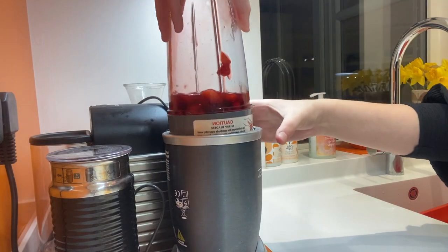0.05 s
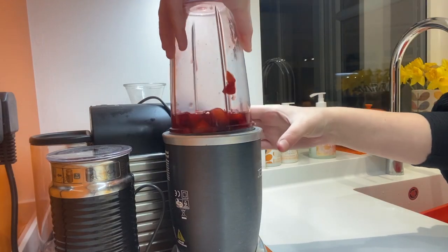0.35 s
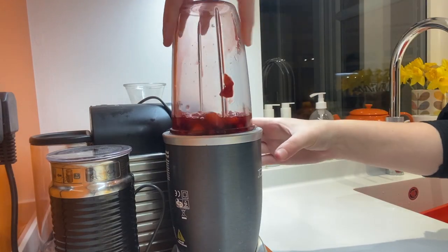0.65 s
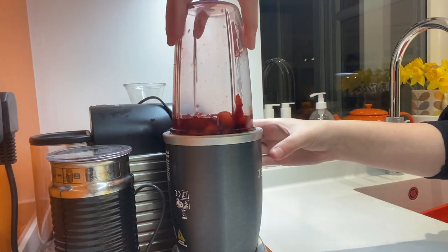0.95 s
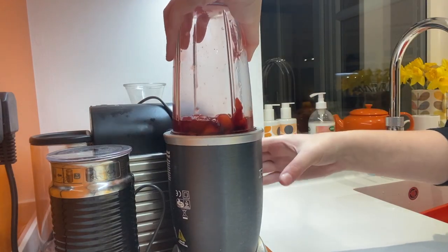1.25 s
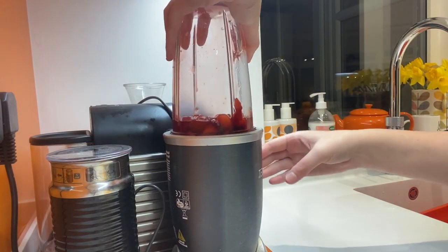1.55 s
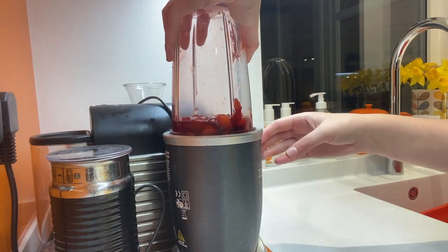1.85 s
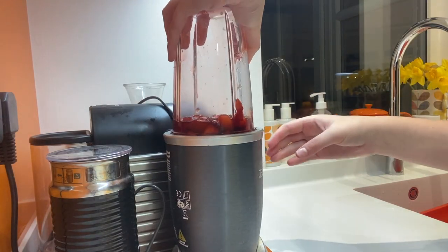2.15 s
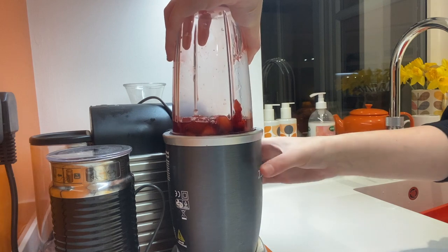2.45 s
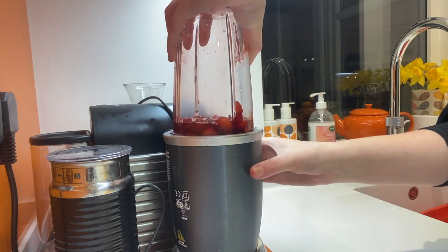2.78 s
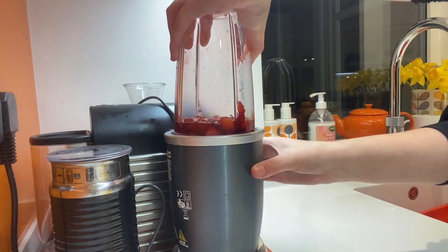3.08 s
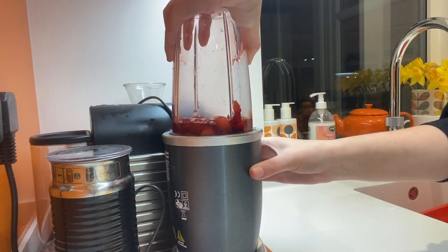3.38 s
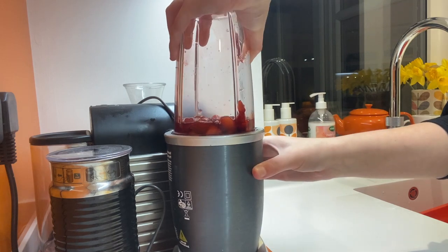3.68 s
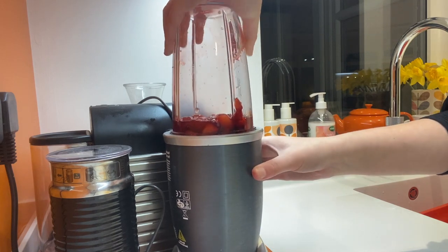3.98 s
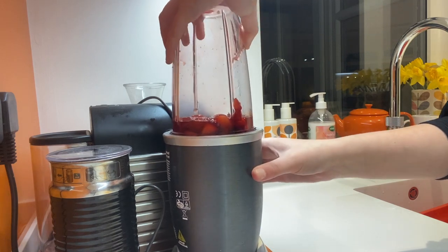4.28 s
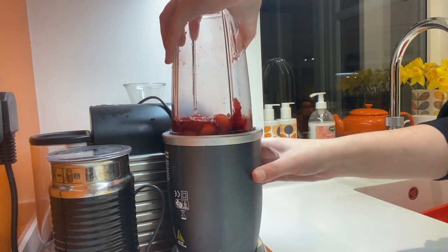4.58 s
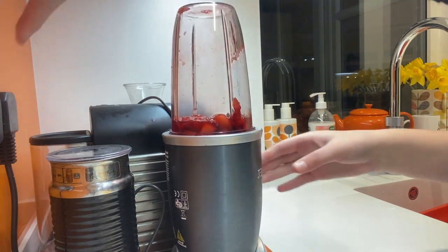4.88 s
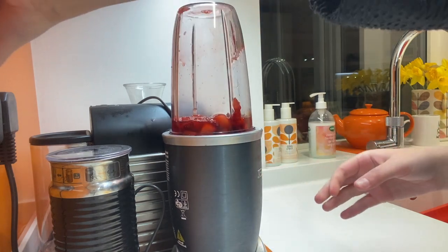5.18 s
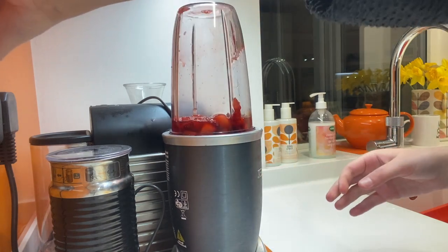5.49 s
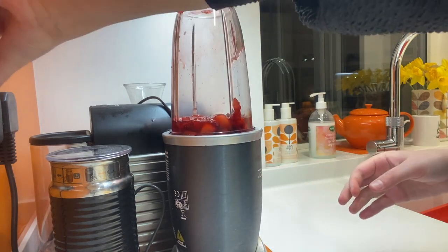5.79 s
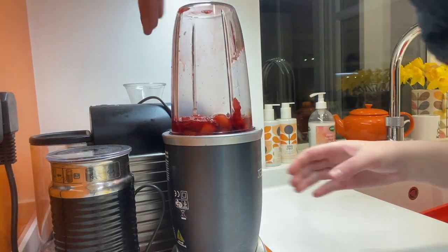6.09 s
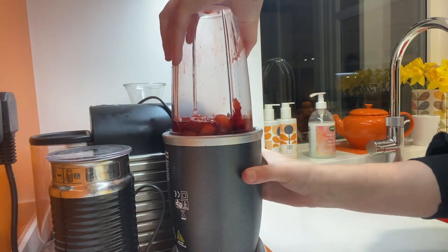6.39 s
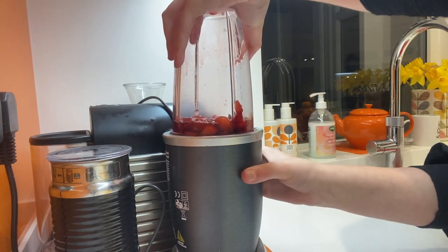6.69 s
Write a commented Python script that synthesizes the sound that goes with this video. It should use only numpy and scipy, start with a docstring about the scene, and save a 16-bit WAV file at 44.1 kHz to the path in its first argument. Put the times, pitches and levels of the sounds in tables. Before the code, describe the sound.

Hollow knocks and sharp plastic snaps of a blender cup being locked in, with rubbing fingers and two switch flicks in a small kitchen.

```python
"""Over a soft hiss, hands set a plastic blender cup on its motor base on a kitchen worktop: the cup
ticks and the heavy base clunks and rocks. Then the cup is pressed down and twisted: its lugs (small
locking tabs) tick and snap in their slots, and fingers slide on the plastic. After 5 seconds a wall
socket's switch is flicked twice. Last come one more rub, knock and snap from the cup.
The motor stays off throughout, and the small hard room answers each blow."""
import sys
import numpy as np
from scipy import signal
from scipy.io import wavfile

SR = 44100
rng = np.random.default_rng(int(sys.argv[2]) if len(sys.argv) > 2 else 0)


def generate_wav(signal):
    """Clip the signal to [-1, 1] and save it as 16-bit WAV at the path in sys.argv[1]."""
    frames = np.transpose(np.atleast_2d(signal))
    scaled = np.clip(frames, -1, 1) * 32767
    pcm = np.round(scaled).astype(np.int16)
    wavfile.write(sys.argv[1], SR, pcm)


N = 297234
RING_S = np.arange(int(.6 * SR)) / SR   # the clock for one ring or echo, in seconds


def from_db(db):
    """Turn decibels into a number to multiply by."""
    return 10 ** (np.asarray(db) / 20)


def rms_one(x):
    """Scale a sound so that its average strength (rms) is 1."""
    return x / np.sqrt(np.mean(x ** 2) + 1e-20)


def at_hz(points, hz):
    """Read between the rows of a table, giving each octave equal room."""
    points = np.array(points)
    return np.interp(np.log(hz), np.log(points[:, 0]), points[:, 1])


def add(out, s, sound):
    """Mix a stereo sound in, starting at s seconds."""
    start = max(int(s * SR), 0)
    out[:, start:start + sound.shape[1]] += sound[:, :N - start]


def mode(hz, t60, rise_cycles, lag_s):
    """One ringing tone: it swells, fades 60 dB in t60 seconds and reaches the right ear later."""
    t = np.maximum(RING_S - np.array([[0], [lag_s]]), 0)
    return np.sin(2 * np.pi * hz * t) * from_db(-60 * t / t60) * (1 - np.exp(-t * hz / rise_cycles))


# How alike the two ears hear noise. Each row: pitch in Hz, likeness (1 is the same, 0 is unrelated).
EAR_LIKENESS = [(60, 0.66), (130, 1), (290, -0.046), (640, 0.014), (1400, -0.21), (3000, 0.087),
                (15000, 0.14)]
def noise_bands(size):
    """Noise from all around, in half-octave bands, each given with its middle pitch."""
    edges_hz = 28 * 2 ** np.arange(0, 9.6, .5)
    white = rng.standard_normal((2, 2, size))
    for k, (low, high) in enumerate(zip(edges_hz, edges_hz[1:])):
        band_filter = signal.butter(2, [low, high], "band", fs=SR, output="sos")
        mid, side = signal.sosfilt(band_filter, white[k % 2])
        hz = np.sqrt(low * high)
        alike = np.clip(at_hz(EAR_LIKENESS, hz), -1, 1)
        yield hz, np.sqrt(1 + alike) * mid + np.sqrt(1 - alike) * side * [[1], [-1]]


def coloured(spectrum):
    """Steady stereo noise whose mix of low and high follows a table."""
    return rms_one(sum(from_db(at_hz(spectrum, hz)) * band for hz, band in noise_bands(N)))


# The tone of the steady hiss. Each row: pitch in Hz, level in dB.
HISS_TONE = [(18, -36), (30, -14), (59, -15), (87, -16.5), (380, -25.5), (530, -31), (1000, -26),
             (1440, -24), (1870, -15), (3070, -18.5), (4200, -46.5), (6700, -22.5), (8250, -33),
             (10200, -52.5), (15000, -47.5)]
def background(edge_hz=3400, thin_db=-5.5):
    """A soft hiss that drops steeply to a fainter, thin top."""
    hiss = coloured(HISS_TONE)
    dull = signal.sosfilt(signal.butter(8, edge_hz, "low", fs=SR, output="sos"), hiss)
    thin = signal.sosfilt(signal.butter(8, edge_hz, "high", fs=SR, output="sos"), hiss)
    return dull + from_db(thin_db) * thin


def echo(x, response, gap_s):
    """Give a mono sound a stereo pattern of echoes, after a short gap."""
    response = rms_one(response) / np.sqrt(len(RING_S))
    delayed = np.pad(response, ((0, 0), (int(gap_s * SR), 0)))
    return signal.fftconvolve(x[None], delayed, axes=1)[:, :N]


def room_clicks(rows, level_db, low_cut_hz=350, usual_bright_db=4.0, bright_share=0.93):
    """A snap spreads in all directions and reaches the room as a plain click."""
    plain, bright = np.zeros((2, N))
    s, db, brightness = np.transpose(rows)[:3]
    at = (s * SR).astype(int)
    plain[at] = from_db(db + level_db)
    bright[at] = plain[at] * (from_db(bright_share * (brightness - usual_bright_db)) - 1)
    clicks = plain + signal.lfilter(*signal.butter(1, 5000, "high", fs=SR), bright + 1e-18)
    return signal.lfilter(*signal.butter(2, low_cut_hz, "high", fs=SR), clicks + 1e-18)


# The tone of the room's echo. Each row: pitch in Hz, level in dB.
ROOM_TONE = [(40, -12), (110, 7.5), (170, 3), (250, -2), (500, -9), (1000, -5.5), (2400, -2), (5000, -9),
             (8000, -5.5), (15000, -13)]
# How long the echo lasts. Each row: pitch in Hz, fade time in seconds.
ROOM_FADE = [(60, 0.21), (200, 0.36), (600, 0.6), (2400, 0.76), (5000, 0.64), (8000, 0.66), (15000, 0.39)]
# The room's air and hard things ring along. Each row: pitch in Hz, level in dB, fade time in seconds.
KITCHEN_RINGS = [(112.2, -45, .38), (246.3, -51.5, .4), (385.6, -51.5, 0.27), (474, -56.5, 0.15),
                 (807, -57, .4), (1294, -54.5, .45), (1893, -47, 0.82), (2006, -47.5, .6),
                 (2270, -48, 0.26), (2376, -48, .5), (2800, -43.5, .5), (3066, -45, 0.39), (4320, -38, .45),
                 (7210, -47, 0.53), (7860, -44, .35)]
def kitchen(near, outward, tail_db=-16.5, early_db=-8.0, early_t60=0.11, rings_db=-20.5):
    """Worktop, wall and appliances throw back quick echoes; then the room rings on."""
    tail = sum(from_db(at_hz(ROOM_TONE, hz) - 60 * RING_S / at_hz(ROOM_FADE, hz)) * band
               for hz, band in noise_bands(len(RING_S)))
    early = sum(band for hz, band in noise_bands(len(RING_S))) * from_db(-60 * RING_S / early_t60)
    early = signal.lfilter(*signal.butter(2, 450, "high", fs=SR), early)
    rings = 0
    for hz, db, t60 in KITCHEN_RINGS:
        # the ears hear low rings in step and high ones apart
        phase = min(hz / 1000, 2) * rng.uniform(-1, 1, (2, 1))
        rings += from_db(db + rings_db - 60 * RING_S / t60) * np.sin(2 * np.pi * hz * RING_S + phase)
    return (from_db(early_db) * echo(near, early, gap_s=0.0045)
            + from_db(tail_db) * echo(outward, tail, gap_s=.008)
            + signal.fftconvolve(outward[None], rings, axes=1)[:, :N])


def stick_slip(slips_per_s=900, slip_s=.001, smooth_drag=.9):
    """Sliding skin catches and lets go in tiny slips, on top of a smooth drag."""
    slips = (rng.random(N) < slips_per_s / SR) * rng.exponential(1, N)
    return rms_one(smooth_drag + signal.lfilter([1], [1, -np.exp(-1 / (slip_s * SR))], slips + 1e-18))


# The tones of rubbing palms and of sliding fingers. Each row: pitch in Hz, level in dB.
PALM_TONE = [(30, -20.5), (50, 2), (110, -0.5), (250, -12.5), (420, -8), (700, -21), (1500, -22.5),
             (4000, -41)]
FINGER_TONE = [(500, -26), (2000, 5), (6000, -11), (8500, -3), (12000, -4.5), (16000, -24.5)]
# When palms hold and when fingers slide. Each row: start in seconds, end in seconds, level in dB.
PALM_GRIPS = [(0, .3, -58.5), (0.311, 1.271, -55), (2.276, 3.55, -59), (3.766, 4.024, -50),
              (4.199, 4.733, -55), (6.238, 6.64, -59)]
FINGER_STROKES = [(0.27, 0.435, -57.5), (0.472, 0.836, -61), (1.077, 1.404, -52.5), (4.003, 4.12, -55),
                  (4.39, 4.486, -59), (4.66, 4.823, -48.5), (4.788, 4.993, -52.5), (6.188, 6.46, -49),
                  (6.373, 6.74, -53)]
def hands(slide_db=-6.0, attack_s=0.015, release_s=0.12):
    """Palms drag on the cup with a low, uneven rub; fingers hiss in scratchy, swelling strokes."""
    t = np.arange(N) / SR
    grip = from_db(2.5 * np.interp(t * 60, np.arange(420), rng.standard_normal(420)))
    waver = from_db(3.5 * np.interp(t * 14, np.arange(100), rng.standard_normal(100)))
    rub = sum(from_db(db) * np.exp(np.minimum(t - start, 0) / attack_s
                                   - np.maximum(t - end, 0) / release_s)
              for start, end, db in PALM_GRIPS)
    slide = sum(from_db(db + slide_db) * np.sin(np.pi * np.clip((t - start) / (end - start), 0, 1))
                for start, end, db in FINGER_STROKES)
    return grip * (rub * coloured(PALM_TONE) + slide * waver * stick_slip() * coloured(FINGER_TONE))


# The tone of cracking plastic. Each row: pitch in Hz, level in dB.
PLASTIC_TONE = [(400, -11.5), (800, 0.5), (1400, -11), (2400, 2), (4000, -1), (5500, -12), (7800, 1),
                (10000, -10.5), (13000, -10), (16000, -13.5)]
def plastic_grain():
    """Plastic has so many short rings that they blur into noise."""
    return coloured(PLASTIC_TONE)


def crack(grain, t60, rise_s, treble_db, treble_t60=0.23):
    """A short burst cut from the noise in grain; its highest sounds die first."""
    start = rng.integers(N - len(RING_S))
    burst = grain[:, start:start + len(RING_S)] * from_db(-60 * RING_S / t60)
    burst *= 1 - np.exp(-RING_S / rise_s)
    treble = signal.lfilter(*signal.butter(1, 5000, "high", fs=SR), burst)
    return burst + (from_db(treble_db - 60 * RING_S / treble_t60) - 1) * treble


# The switch plate and the box behind it. Each row: pitch in Hz, level in dB, fade time in seconds.
SWITCH_RINGS = [(94, -36, 0.12), (172.2, -22, 0.09), (243.4, -32, .12), (356, -9.5, 0.046),
                (489, -15, 0.095), (624, -15, .06), (830, -7, 0.071), (964, -14, 0.055), (1310, -11, .045),
                (1547, -20.5, .04), (1900, -16.5, .055), (2230, -16.5, 0.069), (2422, -13, 0.053),
                (2647, -12.5, 0.098), (4235, -14, 0.043), (7200, -16, .03)]
# The two flicks. Each row: start in seconds, level in dB, brightness in dB, extra thump in dB.
SWITCH_FLICKS = [(5.3776, -4.5, -14.5, 1), (5.759, -6.5, -16, 8.5)]
def wall_switch(grain, crack_db=-5.5, stop_db=-5.0, stop_s=0.0021, plate_db=-1.0, usual_bright_db=-22.0):
    """The springy switch snaps over and hits its stop; the plate rings and the hollow box thumps."""
    out, hz = np.zeros((2, N)), np.array(SWITCH_RINGS)[:, 0]
    rings = np.array([(-1) ** k * mode(f, t60, rise_cycles=1.36, lag_s=0.000515) * from_db(db)
                      for k, (f, db, t60) in enumerate(SWITCH_RINGS)])
    for s, db, brightness, thump_db in SWITCH_FLICKS:
        flip = crack(grain, t60=0.028, rise_s=0.0003, treble_db=brightness - usual_bright_db)
        stop = crack(grain, t60=0.03, rise_s=0.00025, treble_db=3.0)
        plate = np.tensordot(from_db(db + plate_db + thump_db * (hz < 250)), rings, 1)
        add(out, s, from_db(db + crack_db) * flip)
        add(out, s + stop_s / 2, plate)
        add(out, s + stop_s, from_db(db + crack_db + stop_db) * stop)
    return out


def fidgets(per_s=7.9, spread_db=8):
    """List small random shifts of the held cup, stronger under a firmer grip."""
    slots = np.arange(0, N / SR - .1, 1 / per_s)
    delays, sizes = rng.random((200, 2))[:len(slots)].T
    return [(s, db + spread_db * (size - .5)) for s, size in zip(slots + delays / per_s, sizes)
            for start, end, db in PALM_GRIPS if start < s < end]


# The plastic cup ticks against the base and, when twisted, snaps in its slots.
# Each row: start in seconds, level in dB, brightness in dB.
CUP_TICKS_AND_SNAPS = [(0.2763, -39, -10.5), (0.5903, -30, -23.5), (0.818, -24, -18.5),
                       (1.0277, -44.5, -18.5), (1.119, -39, -39.5), (1.1831, -33, -35),
                       (1.2334, -38.5, -12), (1.8226, -38.5, -41), (1.917, -40, -38),
                       (1.9816, -42.5, -13.5), (2.2149, -37, -10), (2.3826, -28, -14), (2.39, -30, -9),
                       (2.402, -23, -13), (2.419, -15.5, -17), (2.5908, -22, -11), (2.8706, -9.5, -14),
                       (3.1991, -34, -15.5), (3.5921, -30.5, -31.5), (3.8036, -25.5, -6),
                       (3.8141, -19, -24), (4.4308, -34, -31.5), (4.5465, -38.5, -52),
                       (5.3032, -39.5, -16.5), (6.2369, -33.5, -38), (6.4924, -38.5, -34),
                       (6.5482, -21.5, -11)]
def ticks(shifts, knock_db=-4.5, knock_bright_db=-31, fidget_db=8, fidget_bright_db=-36.5):
    """List the cup's ticks and snaps, plus a dull tick for each knock and small shift."""
    knock_ticks = [(s, db + hardness + knock_db, knock_bright_db) for s, db, hardness, *_ in CUP_KNOCKS]
    fidget_ticks = [(s, db + fidget_db, fidget_bright_db) for s, db in shifts]
    return list(CUP_TICKS_AND_SNAPS) + knock_ticks + fidget_ticks


def regrip(ring, detune):
    """The changing grip shifts the pitch of a ring a little."""
    stretched_s = RING_S * (1 + detune * rng.standard_normal())
    return np.array([np.interp(stretched_s, RING_S, ear) for ear in ring])


# The tones of the cup wall. Each row: pitch in Hz, level in dB, fade time in seconds.
CUP_RINGS = [(990, -9.5, 0.028), (1306, -25, 0.097), (1655, -8, 0.041), (1980, -30.5, .05),
             (2256, -27.5, 0.037), (2560, -15.5, 0.03), (3560, -5.5, 0.02), (4410, -5.5, 0.021)]
def cup_clicks(contacts, grain, wall_db=-4.5, usual_bright_db=-10.5, scatter_db=7.0):
    """Each tick or snap is a crack, then the short ring of the cup wall."""
    out, hz = np.zeros((2, N)), np.array(CUP_RINGS)[:, 0]
    rings = np.array([mode(f, t60, rise_cycles=1.6, lag_s=0.00016) * from_db(db)
                      for f, db, t60 in CUP_RINGS])
    for s, db, brightness in contacts:
        burst = crack(grain, t60=0.03, rise_s=0.0011, treble_db=brightness - usual_bright_db)
        # dull contacts bring out the hollow middle tones
        dullness = np.clip(-13 - brightness, 0, 16)
        hollow = dullness * at_hz([(1200, -1), (1700, .7), (2400, .1), (3400, .1), (4500, -.6)], hz)
        strengths = from_db(wall_db + hollow + scatter_db * rng.standard_normal(len(hz)))
        wall = np.tensordot(strengths * rng.choice([-1, 1], len(hz)), rings, 1)
        add(out, s, from_db(db) * (burst + regrip(wall, detune=0.038)))
    return out


# The cup bumps the base. Each row: start in seconds, level in dB, hardness in dB (more gives more
# high ring), favoured pitch in Hz, how many seconds earlier a first touch comes (0 for none).
CUP_KNOCKS = [(0.156, -34.5, -14.5, 474, 0.0021), (0.276, -35, -18.5, 216, 0.0011),
              (0.373, -21, -42.5, 151, 0.0022), (0.418, -24, -38, 170, 0), (0.587, -11, -27.5, 212, 0.022),
              (0.818, -4, -20.5, 192, .016), (1.119, -34, -15.5, 295, 0), (1.184, -8, -30, 215, .024),
              (1.313, -40.5, -14, 170, 0.0018), (1.918, -42.5, -20.5, 408, 0), (2.014, -44, -9, 320.5, 0),
              (2.255, -42, -23, 239, 0.00012), (2.426, -27.5, -12.5, 470, .031),
              (2.592, -24, -18, 444, .016), (2.872, -24.5, -19, 355, 0), (3.377, -20, -14, 284, 0.045),
              (3.592, -25.5, -19, 406, 0.00013), (3.607, -26.5, -22, 400, 0.00016),
              (3.642, -14, -22, 455, 0.003), (3.77, -41, -12, 400, 0.002), (3.816, -15, -23.5, 148, 0),
              (4.319, -31, -27, 248, 0.0013), (4.36, -24.5, -17.5, 375, 0.0019), (4.552, -40, -18, 373, 0),
              (4.436, -36.5, -15, 149.8, 0), (4.611, -22.5, -20, 385, 0), (4.76, -42.5, -5, 400, 0),
              (4.987, -51, -10.5, 301, 0.0024), (5.278, -46.5, -3, 387, 0.0013),
              (6.226, -41, -21, 153, 0.0052), (6.549, -26.5, -22.5, 415, .032)]
def bumps(shifts, usual_db=-17.5, usual_hz=249, touch_db=-31.5, touch_follows=0.35,
          rock_s=0.042, rock_loss_db=21.5, rock_hz=162,
          fidget_db=9.5, fidget_hardness_db=-18.0, fidget_hz=320):
    """List every blow to the base: knocks, first touches, rocking back and small shifts."""
    rows = []
    for s, db, hardness, hz, ahead_s in CUP_KNOCKS:
        rows.append((s, db, hardness, hz))
        if ahead_s > 0:
            rows.append((s - ahead_s, touch_db + touch_follows * (db - usual_db), hardness, hz))
        if hz < 275:   # after a low, heavy push the base rocks back onto its feet
            rows.append((s + rock_s, db - rock_loss_db, hardness, rock_hz))
    rows += [(s, db + fidget_db, fidget_hardness_db, fidget_hz) for s, db in shifts]
    blows = []
    for s, db, hardness, hz in rows:
        # low-pitched and gentle pushes carry more low thud
        weight_db = -7 - 7.5 * np.log2(hz / usual_hz) - 0.14 * (db - usual_db)
        blows.append((s, db, weight_db, hardness, hz))
    return blows


# The tone of the grinding rim. Each row: pitch in Hz, level in dB.
RIM_TONE = [(100, -15.5), (300, 0.5), (550, -5.5), (1000, -4), (1500, -12.5), (2500, -20.5), (5000, -38.5)]
def rim_crunch(blows, level_db=3.5, t60=0.0626, rise_s=0.0022):
    """A hard knock briefly grinds the cup's rim into its seat; the right ear hears it later."""
    out, left = np.zeros((2, N)), coloured(RIM_TONE)[0]
    grain = np.array([left, np.roll(left, 20)])
    for s, db, _, hardness, _ in blows:
        add(out, s, from_db(db + hardness + level_db) * crack(grain, t60, rise_s, treble_db=0.0))
    return out


# The tones of the base on the worktop and of the air in the cup.
# Each row: pitch in Hz, level in dB, fade time in seconds, how much louder on the left in dB.
BASE_RINGS = [(46.7, -15, .3, -1), (86.5, -4.5, .06, 2), (112, -3, 0.12, .5), (134.7, -7.5, .08, -1),
              (168.3, -6.5, 0.1, 2.5), (210.4, -11, 0.13, 4.5), (247.1, -5, 0.12, 1),
              (303, -2.5, 0.066, 7.5), (343, -3.5, 0.073, -1.5), (389, 1, 0.098, 7.5),
              (479.4, -5, 0.098, 5), (544, -14, 0.075, 15), (600.6, -15.5, 0.098, 14),
              (694, -14.5, 0.069, 13), (864, -8.5, 0.049, 7), (961.3, -15, 0.058, 12),
              (1054, -24.5, 0.1, 17.5), (1315, -23.5, 0.13, -7.5)]
def base_clunks(blows, level_db=-7.5, usual_weight_db=-13.0, usual_hardness_db=-18.0,
                focus_db=6.5, focus_octaves=0.18, scatter_db=2.5):
    """Heavy pushes wake the low tones of the base; harder contacts wake the high ones."""
    out, hz = np.zeros((2, N)), np.array(BASE_RINGS)[:, 0]
    rings = np.array([(-1) ** k * mode(f, t60, rise_cycles=0.74, lag_s=0.00029)
                      * from_db([[db + pan / 2], [db - pan / 2]])
                      for k, (f, db, t60, pan) in enumerate(BASE_RINGS)])
    rings /= np.abs(rings.sum(0).mean(0)).max()
    for s, db, weight, hardness, favoured_hz in blows:
        low_db, high_db = weight - usual_weight_db, hardness - usual_hardness_db
        tilt = at_hz([(140, low_db), (330, 0.0006), (480, 0.044), (850, high_db)], hz)
        # the length of the push favours the tones near one pitch
        focus = focus_db * np.exp(-(np.log2(hz / favoured_hz) / focus_octaves) ** 2)
        strengths = from_db(db + level_db + tilt + focus + scatter_db * rng.standard_normal(len(hz)))
        add(out, s, np.tensordot(strengths, rings, 1))
    return out


def scene(hiss_db=-57.5, box_db=11.0, box_hz=260):
    """Mix the nearby blender and switch with their echoes, the hands and the hiss."""
    grain, shifts = plastic_grain(), fidgets()
    blows, contacts = bumps(shifts), ticks(shifts)
    base = base_clunks(blows) + rim_crunch(blows)
    switch = wall_switch(grain)
    cup = cup_clicks(contacts, grain) * from_db([[.6], [-.6]])   # slightly to the left
    near = base + cup + switch
    box_thump = from_db(box_db) * signal.lfilter(*signal.butter(2, box_hz, fs=SR), switch[0] + 1e-18)
    clicks = room_clicks(contacts, level_db=25.0) + room_clicks(SWITCH_FLICKS, level_db=26.5)
    outward = base[0] + box_thump + clicks
    return near + kitchen(near[0], outward) + hands() + from_db(hiss_db) * background()


def record(dry, notch_hz=10400, notch_width_hz=1500, low_cut_hz=30, high_cut_hz=15000):
    """The microphone loses the deepest bass and the very top; its openings cut a dip in the treble."""
    notch = signal.iirnotch(notch_hz, notch_hz / notch_width_hz, fs=SR)
    heard = signal.lfilter(*notch, signal.lfilter(*notch, dry))
    heard = signal.sosfilt(signal.butter(2, low_cut_hz, "high", fs=SR, output="sos"), heard)
    heard = heard / (1 + (heard / .75) ** 4) ** .25   # round off the loudest peaks
    return signal.sosfilt(signal.ellip(10, .2, 80, high_cut_hz, fs=SR, output="sos"), heard)


dry = scene()
out = record(dry)
generate_wav(out)
```